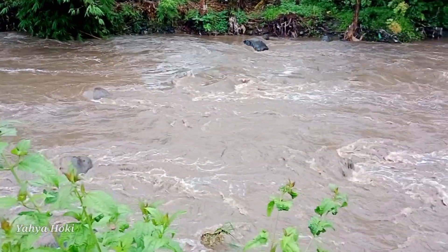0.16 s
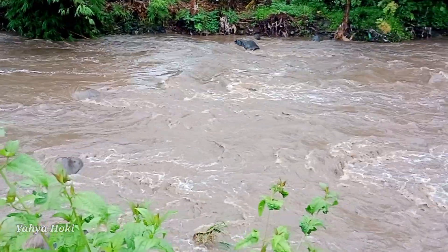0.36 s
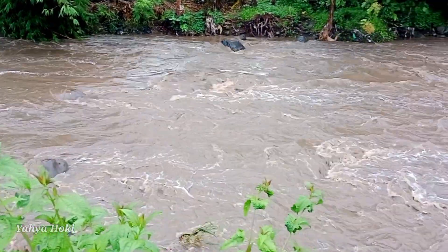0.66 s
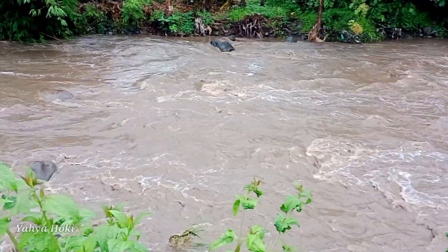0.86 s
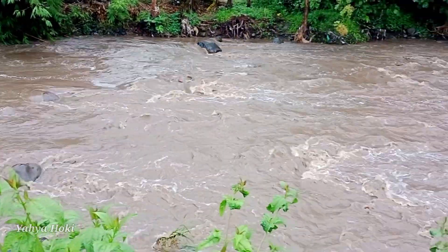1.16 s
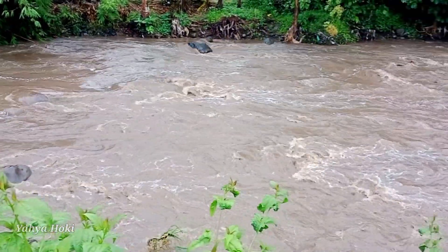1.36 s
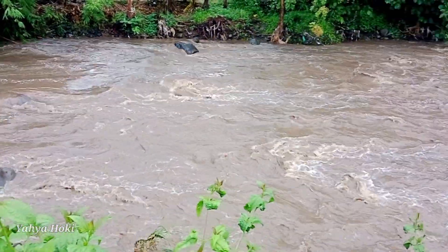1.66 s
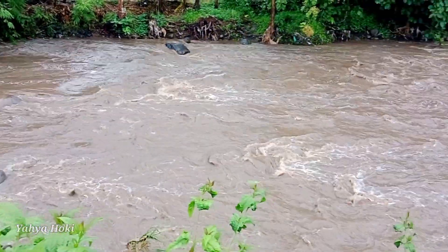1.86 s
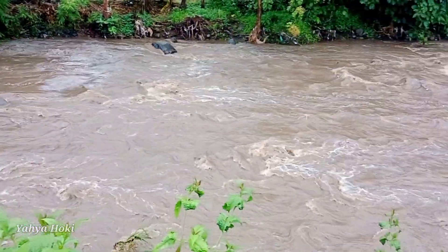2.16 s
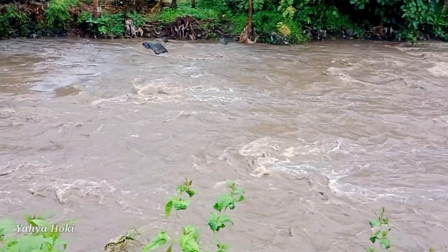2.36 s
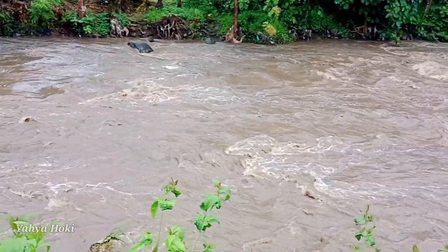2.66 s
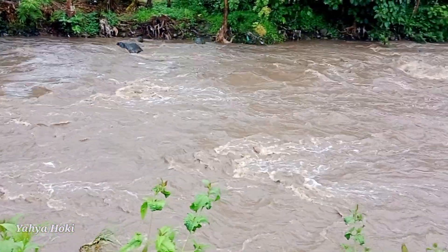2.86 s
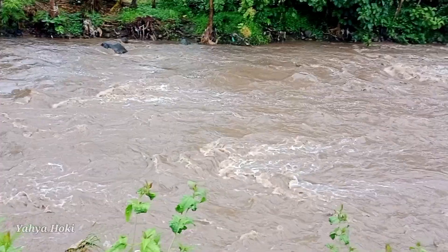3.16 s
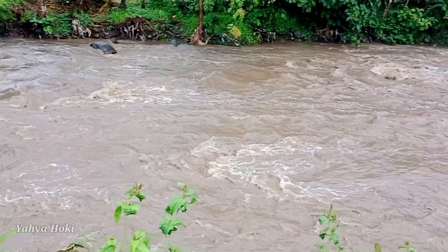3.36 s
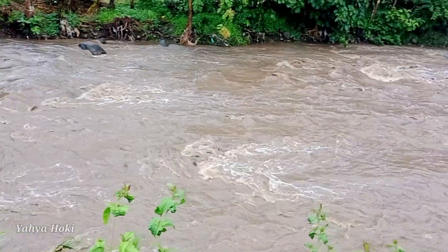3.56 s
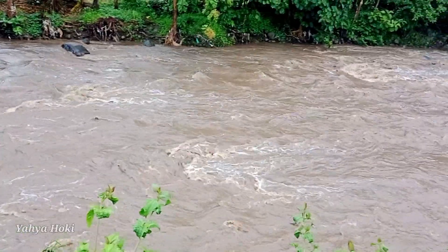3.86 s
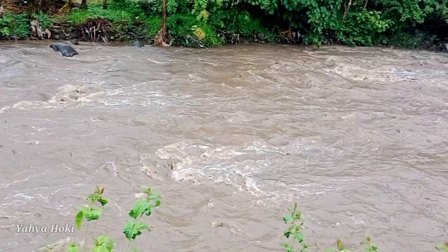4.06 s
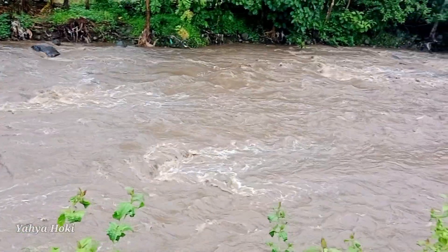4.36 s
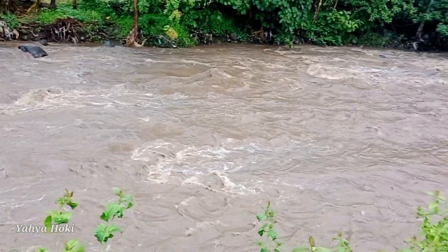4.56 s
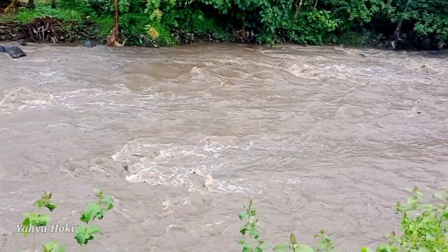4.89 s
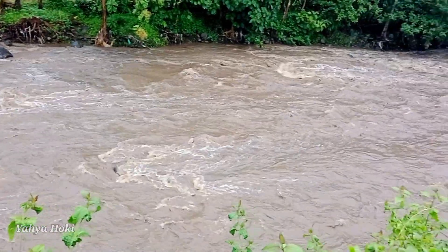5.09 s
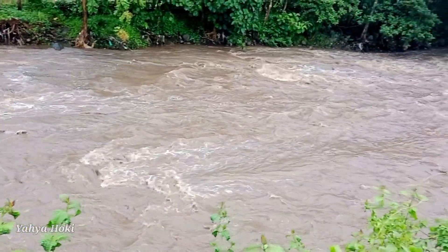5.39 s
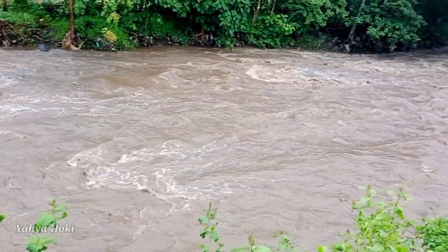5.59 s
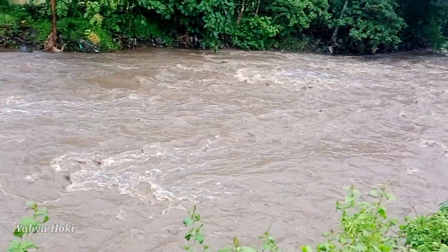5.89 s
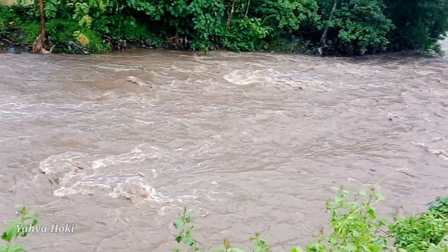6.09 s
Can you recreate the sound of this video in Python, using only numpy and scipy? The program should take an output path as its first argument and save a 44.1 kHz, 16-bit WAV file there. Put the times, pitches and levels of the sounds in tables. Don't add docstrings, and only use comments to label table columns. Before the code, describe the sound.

Steady white-water rush from the first instant to the last, with no build or ending. A tiny dip comes right at the start, then the level stays almost flat, easing only slightly. Soft gulps and small slops bubble irregularly below, with weak dull thumps from heavy waves. Fine hiss of bursting foam is faint above, distant insects barely perceptible. Open-air riverbank, single small mono microphone, fairly close.

```python
import sys
import numpy as np
from scipy import signal
from scipy.fft import rfft, irfft, next_fast_len
from scipy.io import wavfile
from scipy.ndimage import uniform_filter1d

SR = 44100
rng = np.random.default_rng(int(sys.argv[2]) if len(sys.argv) > 2 else 0)


def store_wav(level_fs):
    pcm = np.round(np.clip(np.atleast_2d(level_fs), -1, 1) * 32767)
    wavfile.write(sys.argv[1], SR, pcm.T.astype(np.int16))


def elevation(decibels):
    levels = np.asarray(decibels, float)
    return 10 ** (levels / 20)


N = 274743

# centre f/Hz, width/Hz, level/dB
INSECT_BAND = (4350, 84, -71.5)
# offset from centre [widths], level/dB
INSECT_SKIRT = [(-20, -90), (-4, -40), (-1, -9), (0, 0), (1, -9), (4, -40), (20, -90)]
# f/Hz, level/dB [per Hz]
FOAM_SPECTRUM = [(4300, -62), (4800, -35.5), (5500, -25), (5800, -15.5), (6150, -13), (6400, -7), (7500, 0),
                 (8800, -2.5), (9350, -9.5), (10000, -6), (11500, -12), (12900, -9.5), (13900, -13.5),
                 (15000, -11)]
# f/Hz, level/dB [per Hz]
RUMBLE_SPECTRUM = [(15, -23), (40, -25), (62, -13), (90, -4), (115, -3), (150, 0.5), (190, -8), (300, -45)]
# f/Hz, level/dB [per Hz]
GULP_SPECTRUM = [(100, -52), (150, -14), (200, -6), (250, -0.5), (310, 1), (370, -11.5), (600, -59)]
# f/Hz, level/dB [per Hz]
SLOP_SPECTRUM = [(250, -59), (340, -1), (380, -1), (480, -0.5), (540, 1), (800, -47)]
# t/s, peak level/dB, length/s
THUMP_EVENTS = [(0.16, -52, 0.21), (0.48, -57.5, 0.08), (0.8, -55.0, 0.47), (1.28, -49.5, 0.14),
                (1.7, -56, 0.33), (2.28, -52.0, 0.41), (2.58, -51, 0.05), (2.8, -59.5, 0.58),
                (3.68, -57.0, 0.59), (4.02, -53, 0.1), (4.16, -51.5, 0.19), (4.53, -55.5, 0.18),
                (4.86, -49.5, 0.15), (5.12, -54, 0.3), (5.48, -52.5, 0.1), (5.81, -54, 0.15),
                (6.01, -56, 0.092), (6.28, -50, 0.19)]
# t/s, peak level/dB, length/s
GULP_EVENTS = [(0.07, -39.5, 0.08), (0.22, -40, 0.1), (0.49, -41, 0.12), (0.69, -39.5, 0.16),
               (1.1, -36.5, 0.21), (1.38, -38.5, 0.07), (1.5, -38.5, 0.06), (1.91, -44.5, 0.5),
               (2.13, -33, 0.13), (2.3, -39.5, 0.079), (2.5, -42, 0.1), (2.62, -39.5, 0.07),
               (2.81, -39.0, 0.27), (3.3, -39.5, 0.22), (3.73, -35.5, 0.051), (3.85, -39.5, 0.14),
               (4.09, -38.5, 0.16), (4.27, -42.5, 0.14), (4.47, -40, 0.14), (4.79, -36.5, 0.22),
               (4.92, -40.0, 0.036), (5.08, -41, 0.07), (5.25, -35.5, 0.091), (5.45, -40, 0.061),
               (5.68, -42.5, 0.36), (6.08, -36.0, 0.15)]
# t/s, peak level/dB, length/s
SLOP_EVENTS = [(0, -39.5, 0.28), (0.25, -37, 0.078), (0.68, -39, 0.31), (0.94, -38, 0.03),
               (1.08, -38, 0.11), (1.26, -40.5, 0.16), (1.53, -41, 0.083), (1.91, -43, 0.48),
               (1.98, -39, 0.08), (2.08, -40, 0.062), (2.3, -38, 0.14), (2.49, -37, 0.06),
               (2.77, -39.5, 0.24), (2.92, -42.5, 0.18), (3.24, -46, 0.092), (3.35, -43, 0.3),
               (3.88, -43.5, 0.41), (4.25, -38, 0.1), (4.43, -36, 0.096), (4.59, -39.5, 0.14),
               (4.79, -37.5, 0.063), (4.91, -39, 0.06), (5.03, -39, 0.056), (5.22, -40.5, 0.18),
               (5.6, -38.5, 0.29), (5.73, -41, 0.05), (5.99, -38, 0.1), (6.25, -34.5, 0.17)]
# t/s, level/dB
FLOW_LEVEL = [
    (0.0, -28),
    (0.08, -29),
    (0.1, -31.5),
    (0.15, -29),
    (1.89, -30),
    (4.91, -29.5),
    (5.1, -31),
    (5.15, -29),
    (6.11, -30.5),
    (6.23, -29),
]
# f/Hz, level/dB [per Hz]
ROAR_SPECTRUM = [(250, -41), (460, -18), (560, 0), (763, 0), (1330, -2.5), (2030, -8), (2510, -14.5),
                 (3100, -14.5), (3500, -19), (3800, -26), (4600, -52), (4800, -54), (7000, -90)]
# f/Hz, rms level/dB
SUPPRESSOR_WANDER = [(100, .5), (1000, 1.2), (2500, 1.8), (3800, 2.6), (4700, .8), (5300, 1.2), (6000, 2.4),
                     (7000, .7), (12000, .8)]


def evened(x):
    return x / np.sqrt(np.mean(x ** 2) + 1e-20)


def read(points, hz):
    f, value = np.transpose(points)
    return np.interp(np.log(hz + 1), np.log(f + 1), value)


def coloured(x, spectrum):
    size = next_fast_len(N)
    hz = np.fft.rfftfreq(size, 1 / SR)
    gain = elevation(read(spectrum, hz))
    return evened(irfft(rfft(x, size) * gain, size)[:N])


def patches(bins, frames, size, patch_hz, patch_s):
    per_hz = np.fft.fftfreq(bins, SR / size)[:, None]
    per_s = np.fft.fftfreq(frames, size / 4 / SR)
    blur = np.exp(-(np.pi * patch_hz * per_hz) ** 2 / 2 - (np.pi * patch_s * per_s) ** 2 / 2)
    field = rng.standard_normal((frames, bins)).T
    return evened(np.fft.ifft2(np.fft.fft2(field) * blur).real)


def hiss(size, patch_hz, patch_s, patchy_db, flicker_db):
    hop = size // 4
    frames, bins = N // hop + 5, size // 2 + 1
    real, imaginary = rng.standard_normal((frames, bins, 2)).T
    flicker = evened(uniform_filter1d(rng.standard_normal(frames), size=3))
    patchy = patches(bins, frames, size, patch_hz, patch_s)
    z = (real + 1j * imaginary) * elevation(patchy_db * patchy + flicker_db * flicker)
    return evened(signal.istft(z, nperseg=size, noverlap=size - hop)[1][:N])


def bubbles(low_hz, high_hz, count, per_s, cycles, glide, spread_db):
    out = np.zeros(N)
    for hz in np.geomspace(low_hz, high_hz, count):
        age = np.arange(int(3 * cycles * SR / hz)) * hz / (cycles * SR)
        envelope = (1 - np.exp(-8 * age)) * np.exp(-2 * age)
        ring = envelope * np.sin(2 * np.pi * cycles * (age + glide * age ** 2 / 2))
        ring = ring * np.sqrt(hz) / np.linalg.norm(ring)
        born = rng.random(N) < per_s / count / SR
        polarity = rng.choice([-1.0, 1.0], N)
        strength = elevation(spread_db * np.minimum(rng.exponential(1, N), 4))
        out += signal.oaconvolve(born * polarity * strength, ring)[:N]
    return evened(out)


def collapses(events, rest_db):
    t = np.arange(0, N + 64, 64) / SR
    at, db, length = np.transpose(events)[:, :, None]
    age = (t - at) / np.maximum(length, .02)
    bells = elevation(db) ** 2 * np.exp(-np.log(16) * age ** 2)
    gain = np.sqrt(elevation(rest_db) ** 2 + bells.sum(axis=0))
    return np.interp(np.arange(N) / SR, t, gain)


def flow_db():
    return np.interp(np.arange(N) / SR, *np.transpose(FLOW_LEVEL))


def insects():
    hz, width_hz, db = INSECT_BAND
    chorus = hiss(size=1024, patch_hz=300, patch_s=.05, patchy_db=1.5, flicker_db=1)
    band = [(hz + k * width_hz, level) for k, level in INSECT_SKIRT]
    return elevation(db) * coloured(chorus, band)


def fizz():
    foam = hiss(size=256, patch_hz=3000, patch_s=0.0089, patchy_db=0.37, flicker_db=0.36)
    flow = flow_db()
    follow_db = 0.28 * (flow - flow.mean())
    drift_db = -0.12 * np.arange(N) / SR
    return elevation(-44 + follow_db + drift_db) * coloured(foam, FOAM_SPECTRUM)


def churn():
    gulps = bubbles(152.9, 563.0, count=14, per_s=700, cycles=6.43, glide=.15, spread_db=1.0)
    lumps = hiss(size=2048, patch_hz=120, patch_s=0.13, patchy_db=1.0, flicker_db=0.7)
    pockets = lumps + elevation(-6.5) * gulps
    rumble = collapses(THUMP_EVENTS, rest_db=-62) * coloured(lumps, RUMBLE_SPECTRUM)
    large = collapses(GULP_EVENTS, rest_db=-54.5) * coloured(pockets, GULP_SPECTRUM)
    small = collapses(SLOP_EVENTS, rest_db=-49) * coloured(pockets, SLOP_SPECTRUM)
    return rumble + large + small


def roar():
    cloud = bubbles(398.0, 4015, count=30, per_s=4000, cycles=12.35, glide=0.084, spread_db=0.0)
    wash = hiss(size=1024, patch_hz=400, patch_s=0.064, patchy_db=0.36, flicker_db=0.43)
    return elevation(flow_db()) * coloured(wash + elevation(-7.0) * cloud, ROAR_SPECTRUM)


def scene():
    return (insects() + fizz() + churn() + roar())[None]


def low_pass(x):
    return signal.sosfilt(signal.butter(12, 15500, fs=SR, output="sos"), x)


def record(dry):
    hz, _, z = signal.stft(dry[0], SR, nperseg=1024, noverlap=768)
    wander = patches(*z.shape, size=1024, patch_hz=110, patch_s=.035)
    depth_db = read(SUPPRESSOR_WANDER, hz)[:, None]
    z = z * elevation(depth_db * wander)
    heard = signal.istft(z, SR, nperseg=1024, noverlap=768)[1][None, :N]
    return low_pass(heard)


dry = scene()
out = record(dry)
store_wav(out)
```